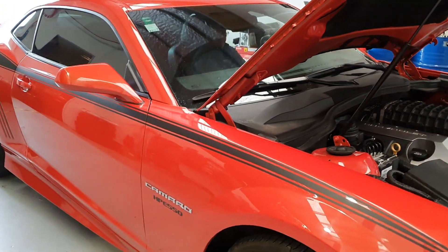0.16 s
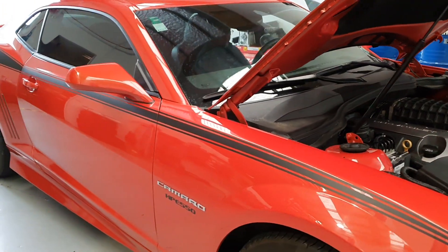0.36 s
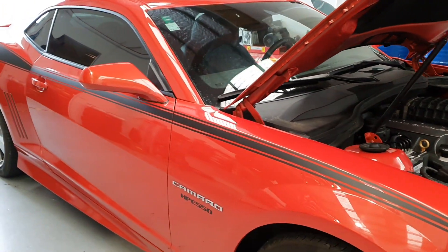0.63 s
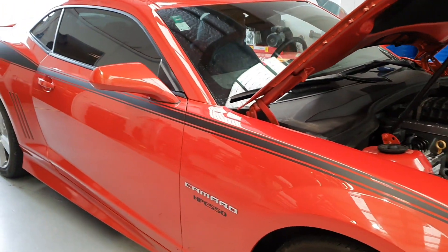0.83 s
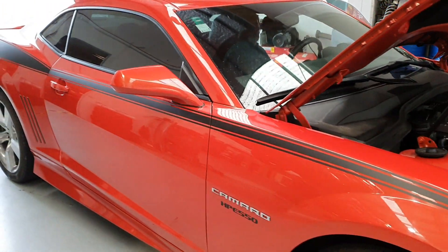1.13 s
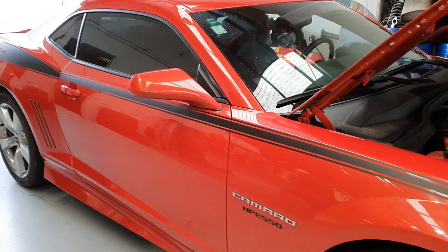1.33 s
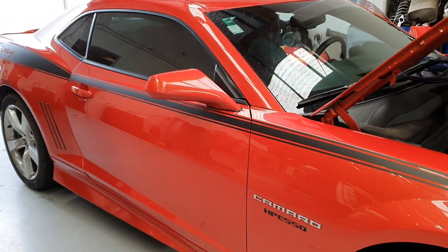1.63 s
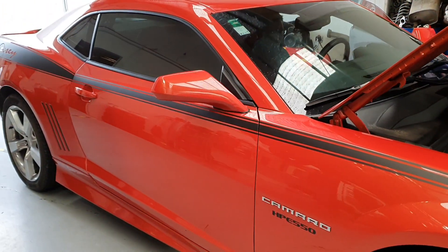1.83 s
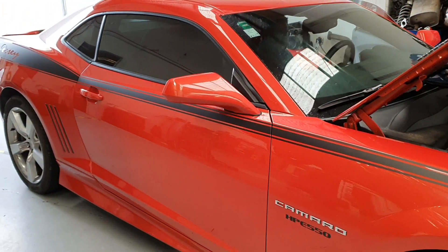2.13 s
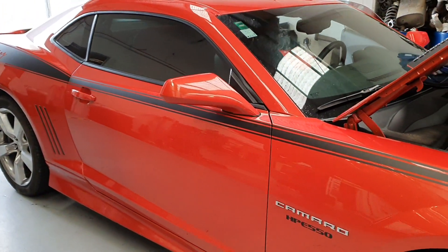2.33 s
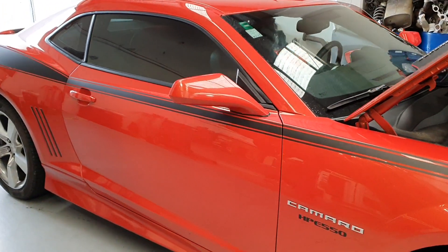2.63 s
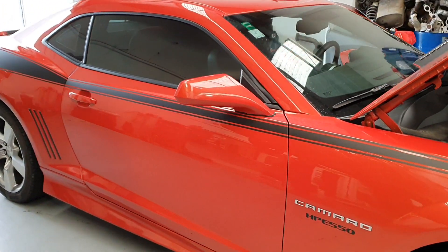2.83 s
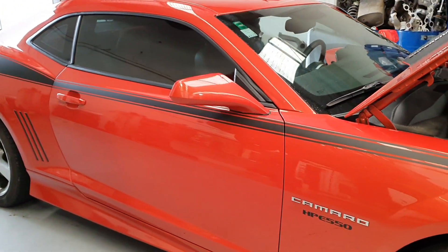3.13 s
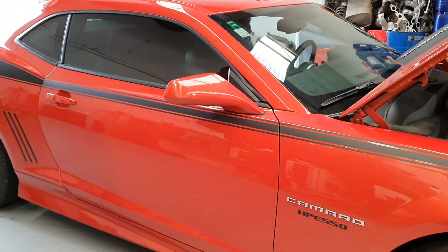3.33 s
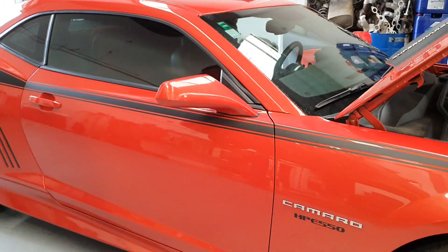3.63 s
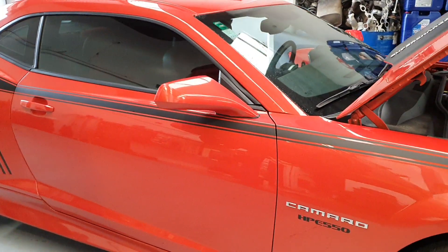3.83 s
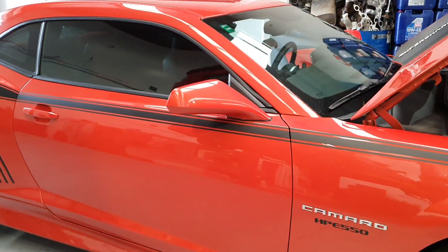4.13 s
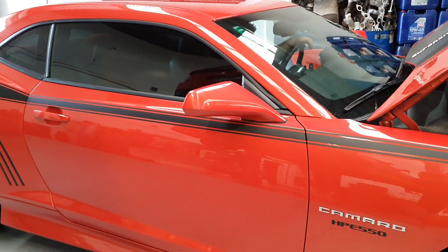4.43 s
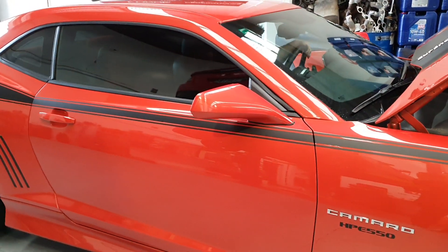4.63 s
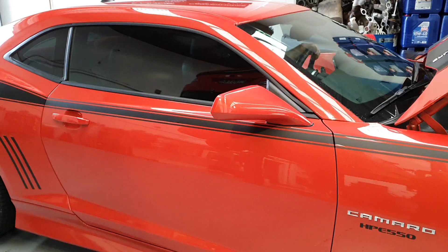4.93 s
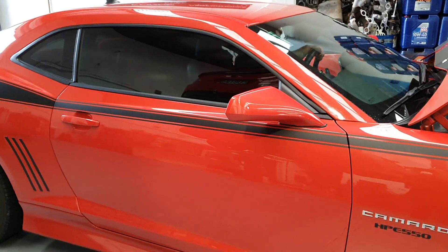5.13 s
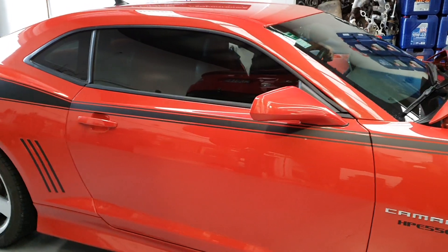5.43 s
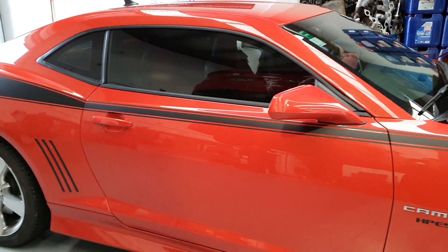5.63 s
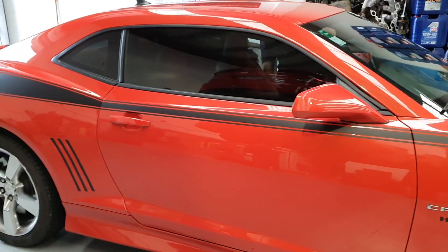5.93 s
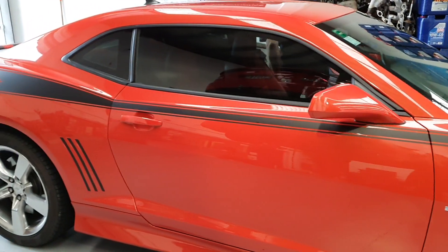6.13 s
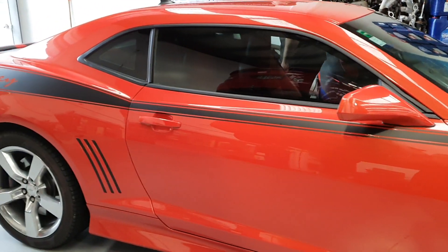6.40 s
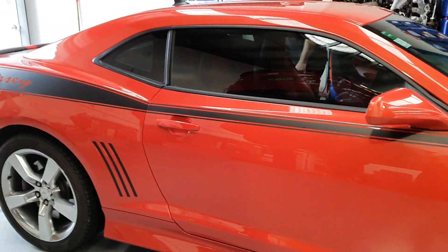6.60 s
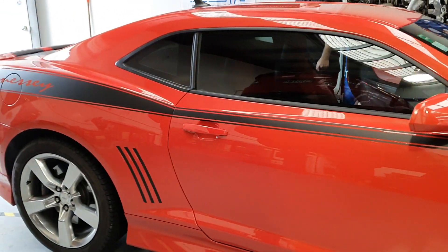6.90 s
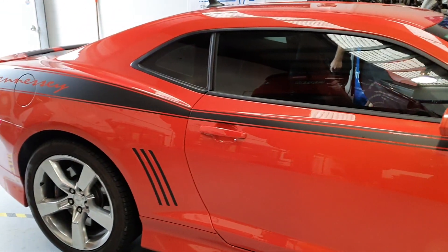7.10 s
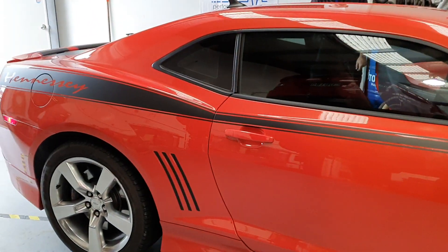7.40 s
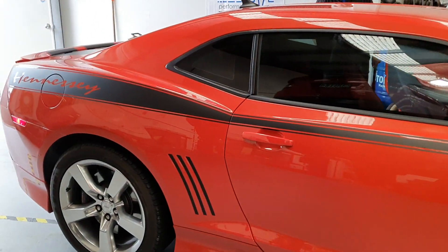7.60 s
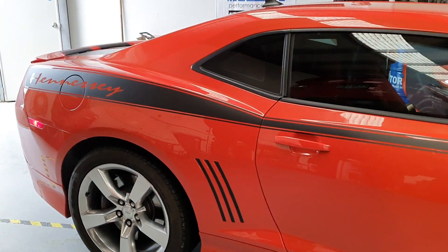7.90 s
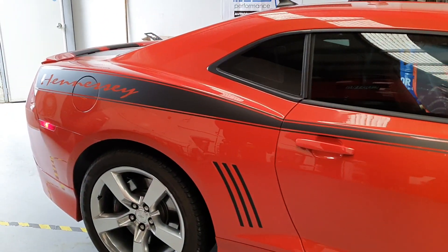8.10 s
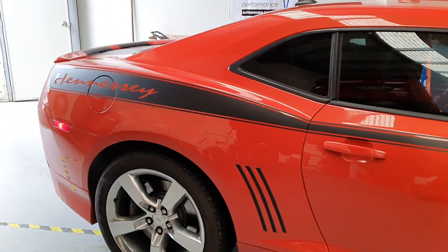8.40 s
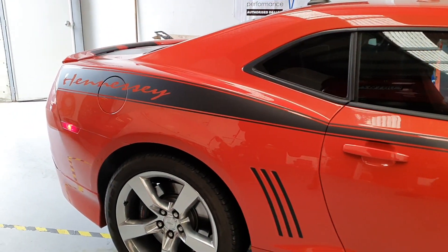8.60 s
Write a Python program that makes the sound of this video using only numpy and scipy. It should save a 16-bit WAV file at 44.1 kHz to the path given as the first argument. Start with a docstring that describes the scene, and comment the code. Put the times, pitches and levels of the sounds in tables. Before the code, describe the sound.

In a workshop, faint cabin knocks and pump whine, then a grinding starter; a big V8 catches, flares loudly and sinks to a lumpy idle.

```python
"""Cold start of a supercharged V8 in a workshop

A supercharged cross-plane V8 is started indoors with its bonnet open, heard in stereo.
Knocks and squeaks come from the cabin, electric pumps whine, then the starter grinds for a second.
The engine catches, flares and sinks to a lumpy idle: exhaust boom, burble and bark under bay clatter.
The boom is a tone at the firing rate; uneven pulses and noise, coloured by spectra, make the rest."""
import sys
import numpy as np
from scipy import signal
from scipy.fft import rfft, irfft
from scipy.io import wavfile
from scipy.ndimage import uniform_filter1d, map_coordinates

SR = 44100
rng = np.random.default_rng(int(sys.argv[2]) if len(sys.argv) > 2 else 0)


def digitize_waveform(pressure):
    """Quantize a signal to 16-bit integers and store it at the path in sys.argv[1].

    Rows of a 2-D input are taken as channels; values are limited to [-1, 1].
    """
    field = np.atleast_2d(pressure).T
    bounded = np.clip(field, -1, 1)
    quanta = np.round(bounded * 32767).astype(np.int16)
    wavfile.write(sys.argv[1], SR, quanta)


N = 385875
T = np.arange(N) / SR  # s

# crankshaft speed through the flare, the fast cold idle and the settled idle: time_s, turns_per_s
CRANK_SPEED = [(3.38, 18.5), (3.46, 17), (3.61, 24.5), (3.8, 28), (4.04, 27.8), (4.35, 26.6), (4.64, 24.85),
               (5.13, 24.8), (5.3, 23.4), (5.44, 21.8), (5.95, 21.85), (6.64, 20.75), (7.8, 20.95),
               (8.3, 20.7), (8.75, 20.1)]
# engine load, hard at the catch, light while coasting off the flare, then held: time_s, over_idle_db
ENGINE_LOAD = [(3.42, 1), (3.58, 2.5), (3.68, -4), (3.95, -3.5), (4.2, -3.5), (4.56, -1.5), (4.68, 1),
               (6.35, -0.5), (6.75, 0.5), (8.0, 0)]
# cylinders in firing order: push (over or under the even flow, set by the bank; ratio),
# lateness (firing intervals)
FIRING_ORDER = [(1.02, 0.028), (-1.35, 0.1093), (0.72, -0.038), (-0.86, 0.1345), (-0.79, 0.065),
                (1.08, -0.031), (-1.02, 0.178), (1.26, 0.0061)]
# starter surges as each piston passes its compression: time_s, gear_mesh_hz, level_db, rise_s
COMPRESSIONS = [(2.635, 428.2, -23, .2), (2.925, 495.8, -22.5, .09), (3.106, 557.6, -20.5, 0.013),
                (3.272, 581.6, -19.5, 0.0089), (3.395, 609, -18, 0.03)]
# spectrum of a hard clack, also the pump's hiss: frequency_hz, density_db (per Hz)
CLACK_SPECTRUM = [(100, -12), (400, -6.5), (1300, 0), (3000, -3), (5800, -6.5), (7600, -19), (10300, -12.5),
                  (15500, -36)]

STARTER_ON_S, STARTER_OFF_S, STARTER_RELEASE_S = 2.39, 3.40, 0.024
DRAG_HZ = 440.3  # tooth rate for which the compression drag is given


def boom(level_db=-10., second_db=-28.0, waver_db=0.47):
    """The even part of the exhaust flow: a deep tone at the firing rate that sags at each weak firing."""
    # weak firings: time_s, lost (share of the boom), half_length_s
    stumbles = [(3.649, 1, 0.012), (4.229, 0.6, 0.016), (4.53, 0.59, 0.025), (5.405, 0.56, 0.013),
                (6.212, 0.33, 0.022), (6.573, 0.29, 0.0092), (7.923, 0.68, 0.01), (8.005, 0.98, 0.0061),
                (8.489, 0.78, 0.009), (8.699, 0.95, 0.0057)]
    turn = 2 * np.pi * (firings() + 0.04 * wander(25))
    strength = 1 - sum(lost * np.exp(-((T - s) / half) ** 2) for s, lost, half in stumbles)
    tone = np.sqrt(2) * (np.sin(turn) + gain_of(second_db) * np.sin(2 * turn))
    level = gain_of(curve(ENGINE_LOAD) + level_db + waver_db * wander(30))
    return tone * strength * level * running(3.392, 0.02)


def burble():
    """The uneven part of the flow rings the low resonances of the pipes."""
    # pipe resonances: frequency_hz, density_db (per Hz)
    resonances = [(25, -29), (41, -33), (52, -0.5), (80, -2.5), (115, 7.5), (165, -2.5), (205, -2.5),
                  (238, -16.5), (278, -3), (310, -16.5), (360, -27.5), (480, -23), (900, -61)]
    # level law: idle_db, fast_idle_rise_db, per_load (dB per dB), catch_rise_db
    law = (-23.5, 5, -0.3, 12)
    pipes = evened(colour(uneven_pulses(rough=1.0, jitter=0.088), resonances))
    return workshop(pipes * gain_of(loudness(*law)) * running(3.39, 0.063), wet_db=-13.5)


def bark(gas_db=1.0, puff_length=1.0, front_hz=1020.0):
    """Pulse fronts leave the tailpipes with puffs of turbulent gas, rasping at speed; a few pops follow."""
    # spectra of bark, rasp and pops: frequency_hz, density_db (per Hz)
    bark_spectrum = [(150, -38), (340, -18), (430, -5.5), (535, 3), (650, 2.5), (830, -5.5), (1050, -13.5),
                     (1500, -22.5), (2400, -26.5), (5000, -44.5)]
    rasp_spectrum = [(500, -13), (780, 8.5), (1050, -1), (1400, -4.5), (2100, -6), (3000, -15.5),
                     (6000, -22)]
    pop_spectrum = [(200, -17), (520, 14), (750, 4), (1200, -17), (2500, -20), (6000, -39)]
    # level laws: idle_db, fast_idle_rise_db, per_load (dB per dB), catch_rise_db
    bark_law = (-30, 10.5, 0.49, 5)
    rasp_law = (-56.5, 17.5, 1.8, 3)
    # unburnt fuel popping in the pipe: start_s, level_db
    fuel_pops = [(3.465, -18.5), (3.679, -6.5), (4.063, -15), (4.351, -24), (4.837, -10), (5.345, -27),
                 (5.419, -25), (7.308, -26)]
    # puff_length is in firing intervals
    puffs = np.exp(-(firings() % 1) / puff_length) * rng.standard_normal(N)
    lowpass = signal.butter(2, front_hz, fs=SR, output="sos")
    fronts = signal.sosfilt(lowpass, evened(uneven_pulses(rough=0.44, jitter=0.041)))
    drive = fronts + gain_of(gas_db) * evened(puffs)
    out = evened(colour(drive, bark_spectrum)) * gain_of(loudness(*bark_law) + 1.0 * wander(11))
    rasp = evened(colour(puffs, rasp_spectrum)) * gain_of(loudness(*rasp_law))
    out = (out + rasp) * running(3.4, 0.058)
    for s, db in fuel_pops:
        add(out, s, gain_of(db) * burst(pop_spectrum, t60=0.031, channels=1))
    return workshop(out, wet_db=-0.5)


def engine_bay(tap_db=-9.0, tap_length=0.78, tap_spread_db=5.0, bypass_db=-19.0):
    """Valves tap twice a firing over the rush of belts and blower; faint whines waver above."""
    # spectra of the rush, the ticks and the bypass air: frequency_hz, density_db (per Hz)
    rush_spectrum = [(530, -16), (900, -0.5), (1060, -12.5), (1320, -6), (1610, -17.5), (2480, -15.5),
                     (3040, -9.5), (3470, -10), (6000, -10), (6600, -12.5), (7620, -26), (9780, -11.5),
                     (10400, -10), (13200, -21.5), (15600, -29.5)]
    tick_spectrum = [(2000, -25), (4400, -15), (5000, 7), (5600, -5), (7800, -12), (10000, -4),
                     (13000, -13), (16000, -22)]
    bypass_spectrum = [(2500, -28), (6000, -2), (7700, -17), (10500, -1), (13000, -9), (16000, -18)]
    # level law: idle_db, fast_idle_rise_db, per_load (dB per dB), catch_rise_db
    law = (-37, 2.5, -0.34, 9.5)
    # faint whines: pitch_hz, level_db (before the doubling below)
    bay_whines = [(1699, -59), (2595, -63), (4540, -61)]
    beat = 2 * firings()
    size = gain_of(tap_spread_db * rng.standard_normal(N))[beat.astype(int)]
    taps = evened(size * np.exp(-(beat % 1) / tap_length))
    rush = rng.standard_normal((2, N)) * np.sqrt(1 + (gain_of(tap_db) * taps) ** 2)
    # the blower draws more air while speeding up: dB per (turn per second squared)
    acceleration = uniform_filter1d(np.gradient(curve(CRANK_SPEED), T), size=SR // 8)
    intake_db = 0.16 * acceleration
    out = evened(colour(rush, rush_spectrum)) * gain_of(loudness(*law) + intake_db + 0.63 * wander(35))
    for hz, db in bay_whines:
        whine = np.sin(2 * np.pi * np.cumsum(hz * (1 + .003 * wander(40))) / SR)
        out += 2 * gain_of(db) * whine * np.array([wander(22), wander(22)])
    for s, db in ticks():
        add(out, s, gain_of(db) * burst(tick_spectrum, t60=.013))
    # the blower spits air through its bypass as the engine catches
    add(out, 3.408, gain_of(bypass_db) * burst(bypass_spectrum, t60=0.35))
    return out * running(3.39, 0.023)


def ticks(count=8):
    """A sharp tick once an engine cycle in the fast idle, swelling and fading: rows of start_s, level_db."""
    first_s, loudest_s, loudest_db, fade_db_per_s = 4.6835, 4.87, -19.5, 23
    cycles = firings() / len(FIRING_ORDER)
    times = np.interp(np.interp(first_s, T, cycles) + np.arange(count), cycles, T)
    return zip(times, loudest_db - fade_db_per_s * abs(times - loudest_s))


def firings():
    """Count of firings so far: four to a turn of the crankshaft."""
    return 4 * np.cumsum(curve(CRANK_SPEED)) / SR


def uneven_pulses(rough, jitter):
    """One pulse a firing; banks alternate irregularly, and combustion scatters more at idle."""
    count = firings()
    k = np.arange(1, 1000)
    push, late = np.array(FIRING_ORDER)[k % len(FIRING_ORDER)].T
    scatter, slip = rng.standard_normal((2, len(k)))
    speed = curve(CRANK_SPEED)
    idling = (speed.min() / np.interp(k, count, speed)) ** 2
    at = np.searchsorted(count, k + late + jitter * idling * slip)
    return np.bincount(at, push + rough * idling * scatter, N + 1)[:N]


def loudness(idle_db, fast_db, per_load, catch_db):
    """Level in dB of one voice of the engine, from its speed, its load and the first rich firings."""
    idle_turns_per_s, fast_turns_per_s = 21.54, 24.92
    catch_s, catch_fade_s = 3.433, 0.056
    fast = np.clip((curve(CRANK_SPEED) - idle_turns_per_s) / (fast_turns_per_s - idle_turns_per_s), 0, 1)
    return idle_db + fast_db * fast + per_load * curve(ENGINE_LOAD) + catch_db * dying(catch_s, catch_fade_s)


def starter(thud_db=-38.0):
    """Pinion teeth whine and grind on the ring gear; the cylinders pump dull air into the exhaust."""
    # spectrum of the gears: frequency_hz, density_db (per Hz)
    gear_spectrum = [(88, -45), (150, -30), (197, -14), (333, -8), (454, -5), (738, -4), (862, 0.5),
                     (1110, -1), (1730, 1.5), (2760, -3.5), (4670, 0), (6630, -1.5), (7590, -14),
                     (9970, -6), (15600, -30.5)]
    teeth = np.cumsum(mesh()) / SR
    bite = 1.0 + np.exp(-(teeth % 1) / 0.34)
    grind = rng.standard_normal((2, N)) * bite * gain_of(1.8 * wander(120))
    whine = gear_whine(patchy_db=10, lead_db=5, between_db=-4)
    gears = colour(.82 * whine + evened(grind), gear_spectrum)
    gears[:, engaged()] = evened(gears[:, engaged()])
    dull = [(25, -31), (55, 2), (75, 3.5), (130, -9), (400, -9.5), (1500, -75)]  # Hz, dB per Hz
    air = evened(colour(rng.standard_normal(N), dull))
    # the air doubles in amplitude as the starter lets go, and stays under the engine
    pumping = running(STARTER_ON_S, 0.21) * mesh() / DRAG_HZ * (1 + running(STARTER_OFF_S, 0.087))
    return workshop(gears * cranking(), wet_db=-6) + gain_of(thud_db) * pumping * air


def gear_whine(patchy_db, lead_db, between_db, order=44):
    """Overtones of the tooth rate and others halfway between, each swelling and fading by chance."""
    turning = engaged()
    turn = 2 * np.pi * np.cumsum(mesh() * (1 + .008 * wander(150)))[turning] / SR
    knots_s = np.linspace(turning.start, turning.stop, num=36) / SR
    out = np.zeros((2, N))
    for k in range(2, order):
        swell_db = patchy_db * np.interp(T[turning], knots_s, rng.uniform(-1, 1, len(knots_s)))
        if k == 8:  # four times the tooth rate leads
            db = lead_db + swell_db / 2
        else:
            db = swell_db + between_db * (k % 2)
        out[:, turning] += gain_of(db) * np.sin(k / 2 * turn + rng.uniform(0, np.pi, (2, 1)))
    out[:, turning] = evened(out[:, turning])
    return out


def mesh():
    """Tooth rate of the starter in Hz: it climbs from stroke to stroke and sags into each compression."""
    drag_share = .33  # speed lost at DRAG_HZ; less as the flywheel spins up
    stroke_s = [STARTER_ON_S] + [row[0] for row in COMPRESSIONS]
    stroke = np.interp(T, stroke_s, np.r_[-.5, np.arange(len(COMPRESSIONS))])
    free_hz = curve(COMPRESSIONS)
    return free_hz * (1 - drag_share * (DRAG_HZ / free_hz) ** 2 * np.sin(np.pi * stroke) ** 2)


def cranking():
    """Gain of the starter: a steady grind that jumps at each stroke and falls back before the next."""
    grind_db, surge_hold = -28.5, 1.52  # level between surges; a higher exponent holds a surge longer
    power = gain_of(grind_db) ** 2
    ends = [row[0] for row in COMPRESSIONS[1:]] + [T[-1]]
    for (s, _, db, rise_s), end in zip(COMPRESSIONS, ends):
        fall = 1 - running(s, end - s) ** surge_hold
        power = power + (gain_of(db) * running(s - rise_s, rise_s) * fall) ** 2
    return np.sqrt(power) * running(STARTER_ON_S, 0.004) * dying(STARTER_OFF_S, STARTER_RELEASE_S)


def engaged():
    """The stretch of samples in which the pinion spins."""
    return slice(round(STARTER_ON_S * SR), round((STARTER_OFF_S + 4 * STARTER_RELEASE_S) * SR))


def knocks():
    """Each blow is a short clack plus the hollow ring of the car body; rubbed trim squeaks upward."""
    # knocks, latches and the starter pinion: start_s, level_db, decay_t60_s,
    # hollow_body_db (relative to the blow, before the halving below)
    blows = [(.176, -47, 0.023, -23), (0.395, -44.5, 0.76, -3.5), (.459, -39.5, 0.06, -7),
             (.488, -43.5, 0.21, 10.5), (0.619, -41, 0.092, -11), (.631, -31, 0.075, -18),
             (1.287, -44, 0.14, -24), (1.379, -44, 0.036, -7), (2.381, -30.5, 0.11, -13),
             (2.395, -11, 0.14, -23.5)]
    # rubbing squeaks: start_s, length_s, start_hz, end_hz, level_db
    rubs = [(.038, .05, 700, 1300, -51), (.1, .08, 850, 1600, -55), (1.29, .05, 780, 1280, -43)]
    # ringing modes of the car body: pitch_hz, level_db, decay_t60_s
    body_modes = [(342, -7, 0.15), (370.5, 2.5, 0.36), (476, -11, .1), (614, 4, 0.37), (663.6, 6, 0.33),
                  (880, -15, .08), (1380, -15, .5)]
    out, t = np.zeros((2, N)), T[:SR // 2]
    ring = 0
    for hz, db, t60 in body_modes:
        ring = ring + gain_of(db) * np.exp(-np.log(1000) * t / t60) * np.sin(2 * np.pi * hz * t)
    for s, db, t60, body_db in blows:
        add(out, s, gain_of(db) * (burst(CLACK_SPECTRUM, t60) + .5 * gain_of(body_db) * ring))
    for s, length, start_hz, end_hz, db in rubs:
        hz = np.geomspace(start_hz, end_hz, int(length * SR))
        turn = 2 * np.pi * np.cumsum(hz * (1 + .25 * rng.standard_normal(SR)[:len(hz)])) / SR
        slips = np.sin(turn) + .8 * np.sin(2 * turn)
        rub = .6 * burst(CLACK_SPECTRUM, t60=1)[:, :len(hz)]
        add(out, s, gain_of(db) * (slips + rub) * signal.windows.tukey(len(hz), .5))
    return workshop(out, wet_db=-1)


def pumps(fuel_whine_db=-5.5):
    """The fuel pump primes with a hiss and a rising whine; a second small motor sings in beating tones."""
    # tones of the small motor: pitch_hz, level_db (relative)
    motor_tones = [(721, -10.5), (750, -0.5), (2160, -23), (2643, -22), (2882, -17.5), (4200, -27)]
    # brief swells of the small motor's whine: time_s, level_db, half_length_s
    motor_swells = [(1.348, -45.5, 0.02), (1.48, -53, .04)]
    motor_on_s, motor_rise_s, motor_start_db, growth_db_per_s = 0.98, 0.092, -59.5, 4
    hunt_db, hunt_per_s, settled_s = 5, 25, 1.46  # the whine wavers until the motor settles
    fuel_on_s, fuel_rise_s, primed_s, fuel_fade_s = .6, .1, 1.42, 0.2
    priming_db, holding_db, start_hz, primed_hz = -56, -66, 1250, 1430

    whine = 0
    for hz, db in motor_tones:
        whine = whine + gain_of(db) * np.sin(2 * np.pi * np.cumsum(hz * (1 + 0.00099 * wander(7.0))) / SR)
    singing = gain_of(motor_start_db + growth_db_per_s * (T - motor_on_s))
    singing = singing * running(motor_on_s, motor_rise_s)
    singing = singing * gain_of(hunt_db * wander(hunt_per_s) * dying(settled_s, 0.071))
    singing = singing + sum(gain_of(db) * np.exp(-((T - s) / half) ** 2) for s, db, half in motor_swells)

    hiss = evened(colour(rng.standard_normal((2, N)), CLACK_SPECTRUM))
    fuel_hz = np.interp(T, [fuel_on_s, primed_s], [start_hz, primed_hz])
    fuel_whine = np.sin(2 * np.pi * np.cumsum(fuel_hz * (1 + 0.0343 * wander(300))) / SR)
    fuel_db = holding_db + (priming_db - holding_db) * dying(primed_s, fuel_fade_s)
    priming = gain_of(fuel_db) * running(fuel_on_s, fuel_rise_s)
    fuel_pump = (hiss + gain_of(fuel_whine_db) * fuel_whine) * priming
    return (np.sqrt(2) * whine * singing + fuel_pump) * dying(STARTER_ON_S, .05)


def floor(level_db=-51.5, hum_hz=152., hum_db=-57.0):
    """The low hum and air of the building, a little stronger at first."""
    # spectrum of the room's air: frequency_hz, density_db (per Hz)
    air_spectrum = [(25, -22), (45, -3), (80, 3), (120, -10), (155, -6), (200, -11), (500, -18),
                    (1000, -26), (3000, -37.5), (6000, -34), (8000, -58.5), (10500, -32.5), (15500, -71)]
    air = rng.standard_normal(N) + .5 * rng.standard_normal((2, N))  # mostly common to both channels
    hum = np.sin(2 * np.pi * hum_hz * T) * (1 + .5 * wander(8.05))
    swell = gain_of(np.interp(T, [.7, 1.1], [2.5, 0]))
    return swell * (gain_of(level_db) * evened(colour(air, air_spectrum)) + gain_of(hum_db) * hum)


def workshop(x, wet_db):
    """Adds the room: sparse reflections of random sign, different at each microphone port."""
    # reverberation of the workshop: frequency_hz, decay_t60_s
    decay = [(200, 0.79), (1000, 0.48), (4000, 0.89), (12000, 0.39)]
    taps = rng.choice([-1., 1.], (2, SR)) * (rng.random((2, SR)) < 3000 / SR)
    hz, t, z = signal.stft(taps, SR, nperseg=256)
    tail = signal.istft(z * gain_of(-60 * t / read(decay, hz)[:, None]), SR, nperseg=256)[1]
    echo = signal.oaconvolve(x * np.ones((2, 1)), tail / np.linalg.norm(tail[0]), axes=1)[:, :N]
    return (x + gain_of(wet_db) * echo) / np.sqrt(1 + gain_of(wet_db) ** 2)


def burst(spectrum, t60, channels=2, rise=0.0088):
    """A dying puff of coloured noise; longer puffs start more softly."""
    t = T[:SR // 2]
    envelope = np.exp(-np.log(1000) * t / t60) * (1 - np.exp(-t / (rise * t60)))
    return evened(colour(rng.standard_normal((channels, len(t))), spectrum)) * envelope / envelope.max()


def colour(x, spectrum, size=8192):
    """Causal minimum-phase filter with the given spectrum."""
    log_gain = np.log(gain_of(read(spectrum, abs(np.fft.fftfreq(size, 1 / SR)))))
    taps = np.fft.ifft(np.exp(np.conj(signal.hilbert(log_gain)))).real[:size // 2]
    return signal.oaconvolve(np.atleast_2d(x), taps[None], axes=1)[:, :x.shape[-1]]


def wander(per_s):
    """Smooth chance of rms 1 that changes about per_s times a second."""
    knots = rng.standard_normal(8192)
    return evened(map_coordinates(knots, [T * per_s], order=3, mode="wrap"))


def running(start_s, rise_s):
    """Goes from 0 to 1 as a machine starts."""
    return np.clip((T - start_s) / rise_s, 0, 1)


def dying(from_s, fade_s):
    """Stays at 1 until from_s, then dies away."""
    return np.exp(-np.maximum(T - from_s, 0) / fade_s)


def gain_of(db):
    """Amplitude ratio of a level in dB."""
    return 10 ** (np.asarray(db) / 20)


def evened(x):
    """Scales a sound so that the mean of its channels has rms 1."""
    return x / np.sqrt(np.mean(np.atleast_2d(x).mean(0) ** 2) + 1e-20)


def curve(rows, axis=1):
    """One column of a table, joined by straight lines in time."""
    columns = np.transpose(rows)
    return np.interp(T, columns[0], columns[axis])


def read(points, hz):
    """Value of a table at each frequency, joined by straight lines over log frequency."""
    f, value = np.transpose(points)
    return np.interp(np.log(hz + 1), np.log(f + 1), value)


def add(mix, s, sound):
    """Lays a sound into the mix from s seconds on, cut at the end."""
    part = mix[..., round(s * SR):][..., :sound.shape[-1]]
    part += sound[..., :part.shape[-1]]


def scene():
    """The engine, its starter, the cabin noises and pumps, and the building."""
    return floor() + knocks() + pumps() + starter() + boom() + burble() + bark() + engine_bay()


def record(dry):
    """The right port is shaded in the treble; peaks stop at full scale; then the band limit."""
    # treble balance of the microphone ports: frequency_hz, left_minus_right_db
    port_balance = [(4000, 0), (6000, 2.5), (8000, 1), (10500, 8), (13000, 16.5), (16000, 6)]
    edge_hz = 15750
    ratio = gain_of(read(port_balance, np.fft.rfftfreq(N, 1 / SR)))
    shading = np.array([ratio, np.ones_like(ratio)]) * np.sqrt(2 / (1 + ratio ** 2))
    heard = irfft(rfft(dry) * shading, N)
    band_limit = signal.firwin(511, edge_hz, window=("kaiser", 9), fs=SR)
    return signal.oaconvolve(np.clip(heard, -1, 1), band_limit[None], "same")


dry = scene()
out = record(dry)
digitize_waveform(out)
```